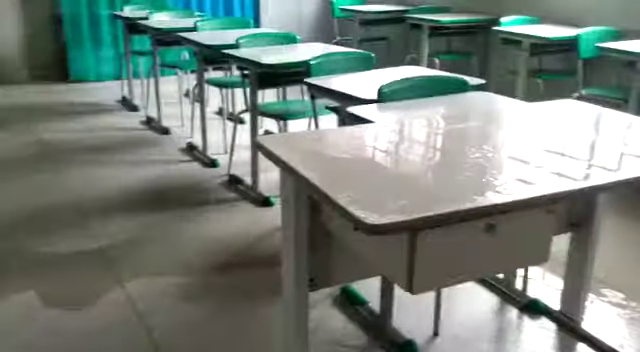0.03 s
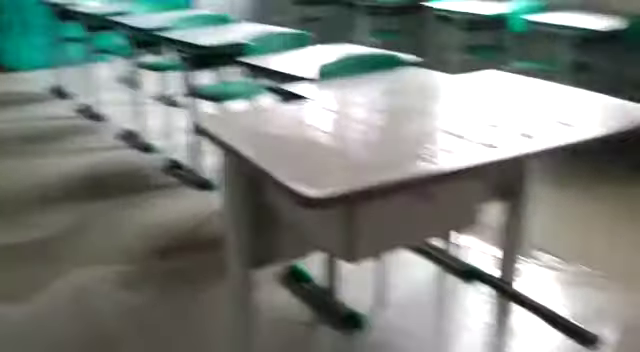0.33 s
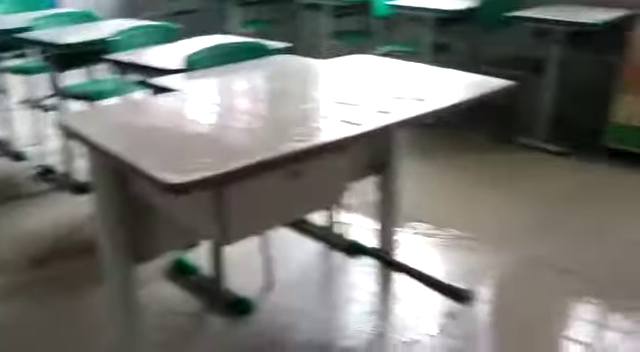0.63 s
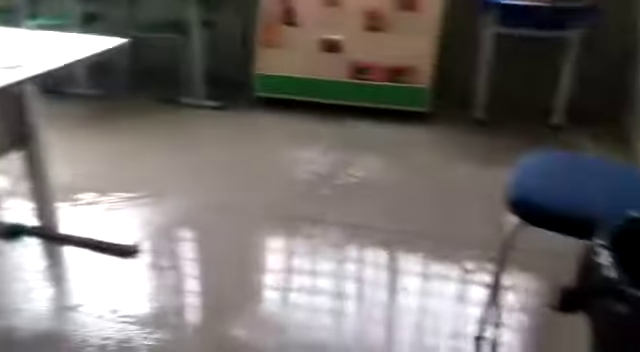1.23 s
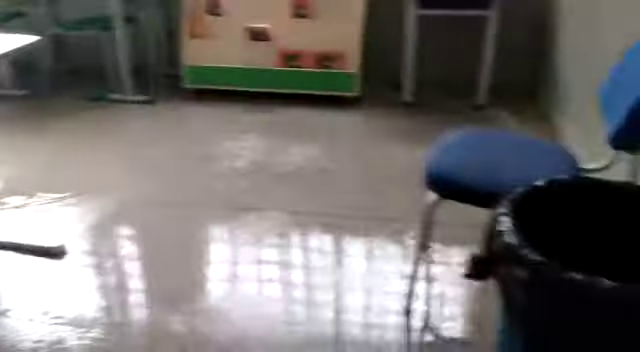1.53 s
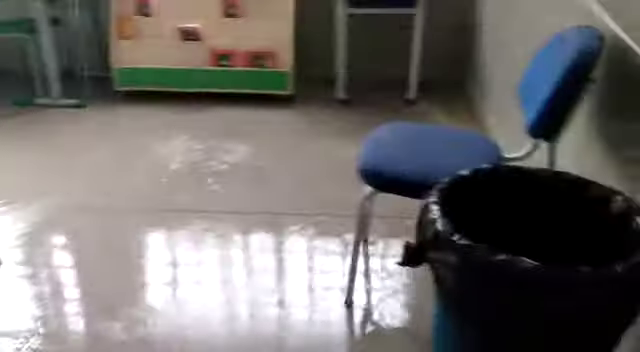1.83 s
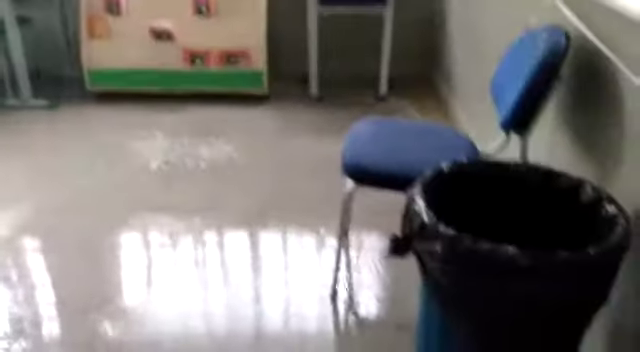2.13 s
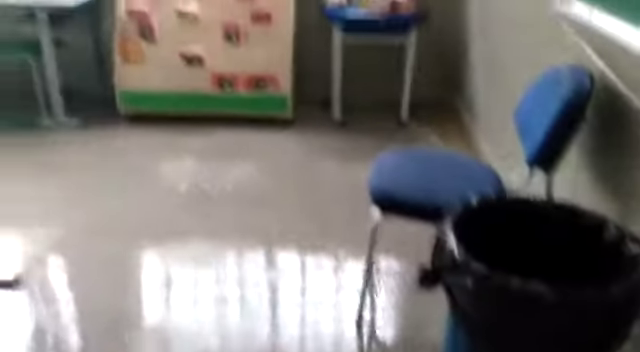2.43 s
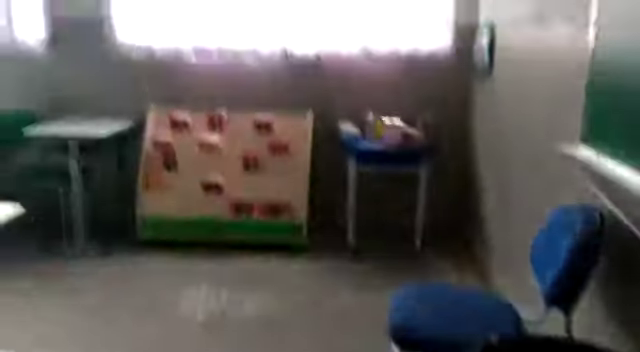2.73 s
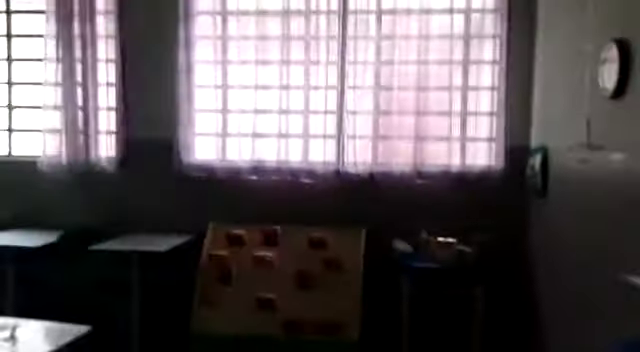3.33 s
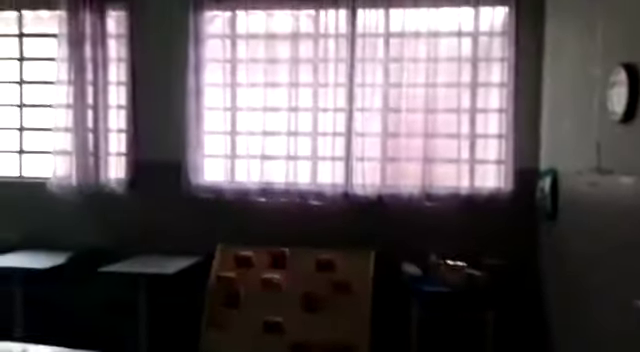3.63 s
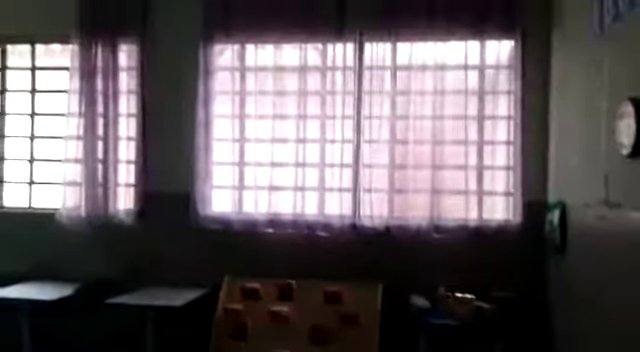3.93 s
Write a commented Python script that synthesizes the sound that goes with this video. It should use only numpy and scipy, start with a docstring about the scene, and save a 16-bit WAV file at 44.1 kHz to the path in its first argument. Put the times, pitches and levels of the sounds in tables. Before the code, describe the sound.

Irregular water drips splat and plip near the microphone in a bare classroom, each with a bright echo, slightly to the right. Behind them are a steady hiss of rain, a dying low rumble and faint, distant hollow tones.

```python
"""Sharp splats and lower plips ring out in an empty classroom: rain leaks through the ceiling
and drips onto wet tiles and desks. Each drop is a pulse and a short spray, which the hard room
answers with a long bright tail. Behind them are fine spatter, a steady rain hiss and a low rumble
that dies away. Faint hollow tones, narrow bands of noise, come from far off."""
import sys
import numpy as np
from scipy import signal
from scipy.fft import rfft, irfft
from scipy.io import wavfile
from scipy.ndimage import uniform_filter1d

SR = 44100
rng = np.random.default_rng(int(sys.argv[2]) if len(sys.argv) > 2 else 0)


def dump(signal):
    """Clip the signal to [-1, 1] and save it as 16-bit WAV at the path in sys.argv[1]."""
    limited = np.clip(np.atleast_2d(signal).T, -1, 1)
    pcm = np.round(limited * 32767).astype(np.int16)
    wavfile.write(sys.argv[1], SR, pcm)


N = 176400
TOP_HZ = 16000
ROOM_PAN_DB = -6.5  # every pan is left minus right: the room leans right


def undb(db):
    """Decibels to gain."""
    return 10 ** (np.asarray(db) / 20)


def unit(x):
    """Scale to rms 1."""
    return x / np.sqrt(np.mean(x ** 2))


def sides(pan_db):
    """Left and right gains of constant total power."""
    return unit(undb(np.array([[pan_db], [-pan_db]]) / 2))


def freqs(size=N):
    """Frequencies of a spectrum."""
    return np.arange(size // 2 + 1) * SR / size


def eq(points):
    """Gain over frequency through (Hz, dB) points on a log axis."""
    hz, db = np.array(points, float).T
    return undb(np.interp(np.log(freqs() + 1), np.log(hz), db))


def fader(rows):
    """Gain over time from rows that begin with seconds and dB."""
    times, db = np.array(rows).T[:2]
    return undb(np.interp(np.arange(N) / SR, times, db))


def bell(hz, octaves, size=N):
    """Gain over frequency of one resonance."""
    return np.exp(-(np.log2((freqs(size) + 1) / hz) / octaves) ** 2 / 4)


def drift(per_s):
    """Slow random wander of rms 1."""
    hold = int(SR / per_s)
    steps = np.repeat(rng.standard_normal(N // hold + 1), hold)
    return unit(uniform_filter1d(steps, hold)[:N])


def ripple(f, step_hz, depth_db):
    """Irregular peaks and dips about step_hz apart; the power stays even over several of them."""
    places = np.cumsum(rng.uniform(.4, 1.6, 1024)) * step_hz
    heights = (-1.) ** np.arange(1024) * rng.uniform(.3, 1.7, 1024)
    gain = undb(depth_db * np.interp(f, places, heights))
    return gain / np.sqrt(uniform_filter1d(gain ** 2, int(4 * step_hz / f[1])))


def diffuse(gain, spacing_m=0.16):
    """Room-filling noise of rms 1: the bass is alike at both microphones, the treble is not."""
    alike = .98 * np.sinc(2 * freqs() * spacing_m / 343)
    mid, side = (irfft(rfft(rng.standard_normal(N)) * gain * np.sqrt(1 + sign * alike), N)
                 for sign in (1, -1))
    return unit(np.array([mid + side, mid - side]))


def add(out, x, at):
    """Mix a sound in at a time in seconds."""
    i = max(int(at * SR), 0)
    out[:, i:i + x.shape[1]] += x[:, :max(out.shape[1] - i, 0)]


# Tone of the rumble's three registers. Each row: frequency in Hz, relative level in dB before roll-off.
DEEP_EQ = [(12, -36), (25, 1), (36, -16), (48, 6), (62, 4), (90, -30)]
BODY_EQ = [(45, -18), (75, 2), (125, 7.5), (180, 1), (260, -35)]
UPPER_EQ = [(130, -17), (200, 1.5), (310, -5), (430, -12.5), (600, -46), (1500, -34.5)]
# Their fader rides. Each row: time in seconds, gain in dB.
DEEP_RIDE = [(0.0, -52.5), (0.49, -62), (0.53, -48), (1.3, -57.5), (1.63, -44.5), (1.73, -47.5),
             (2.07, -54), (2.52, -70), (2.64, -62.5), (3.63, -73), (4.0, -89)]
BODY_RIDE = [(0.0, -41), (0.23, -36), (0.41, -43.5), (0.79, -41), (0.96, -46), (1.88, -37.5), (2.28, -46.5),
             (2.54, -69.5), (2.66, -58), (3.55, -67), (3.59, -54), (3.93, -70.5), (4.0, -85)]
UPPER_RIDE = [(0.0, -39), (0.89, -46), (1.02, -57.5), (1.15, -39), (1.24, -51), (1.32, -39.5), (1.38, -52),
              (1.47, -51.5), (1.65, -62.5), (1.84, -56), (2.1, -53.5), (2.49, -73.5), (3.56, -75.5),
              (3.72, -60.5), (4.0, -84)]

def rumble():
    """Three registers of low noise roll and die away; the upper one flutters."""
    def register(colour, ride):
        roll_off = 1 + (freqs() / colour[-1][0]) ** 2
        return diffuse(eq(colour) / roll_off) * fader(ride)

    low = register(DEEP_EQ, DEEP_RIDE) + register(BODY_EQ, BODY_RIDE)
    return low + register(UPPER_EQ, UPPER_RIDE) * undb(-1.5 + 2 * drift(13))


# A hollow sigh, far off. Each row: time in seconds, level in dB, centre in Hz.
SOUGH_PATH = [(0.0, -64.5, 787), (.23, -58.5, 812), (.44, -49.5, 770.5), (.64, -55, 811.3),
              (.98, -64.5, 785), (1.2, -56, 796.6), (1.36, -59, 885.6), (1.6, -70.5, 781.5),
              (4.0, -85, 788)]

def sough(width_hz=55):
    """A narrow band of noise whose centre wanders and whose level wavers."""
    times, _, centres = np.array(SOUGH_PATH).T
    hz = np.interp(np.arange(N) / SR, times, centres)
    band = diffuse(np.exp(-((freqs() - hz.mean()) / width_hz / 2) ** 2))
    glide = np.exp(2j * np.pi * np.cumsum(hz - hz.mean()) / SR)
    return np.real(signal.hilbert(band) * glide) * fader(SOUGH_PATH) * undb(2 * drift(14))


# Dull bumps in the rumble, and faint hollow tones from far off.
# Each row: start in seconds, seconds until the fade, centre in Hz, width in octaves, level in dB.
DULL_BUMPS = [(.2, 0.085, 198, 0.22, -41), (1.45, 0.048, 323, .12, -50), (1.8, 0.085, 264, 0.18, -47)]
FAR_TONES = [(.485, 0.023, 1155, 0.038, -52), (1.865, 0.054, 912, 0.052, -55.5),
             (3.38, 0.6, 743, 0.077, -63), (3.555, .33, 1488, .018, -63), (3.58, 0.16, 1130, .04, -61.5),
             (3.7, .3, 454, 0.068, -58), (3.81, 0.07, 307, .04, -63.5), (3.88, 0.19, 1135, 0.045, -57)]

def swells(rows, rise_s=0.015, fade_s=0.033):
    """Resonant bands of noise that rise, hold and fade."""
    t = np.arange(N) / SR
    out = np.zeros((2, N))
    for at, length, hz, octaves, db in rows:
        rise = np.clip((t - at) / rise_s, 0, 1)
        fade = np.exp(-np.maximum(t - at - length, 0) / fade_s)
        out += diffuse(bell(hz, octaves)) * rise * fade * undb(db)
    return out


# Tone of the rain bed, airy on top. Each row: frequency in Hz, relative level in dB.
RAIN_EQ = [(100, 0), (300, -9), (460, -3.5), (620, -4.5), (760, -8.5), (1000, -7.5), (1500, -9.5),
           (2200, -12), (4000, -10.5), (7000, -23), (11000, 4), (15500, 6.5)]
# Fader ride for hiss, spatter and crackle, with two brief dips. Each row: time in seconds, gain in dB.
RAIN_RIDE = [(1.7, 2.5), (1.96, -0.5), (2.2, 5), (2.39, -2.5), (2.45, 1.5)]

def rain(hiss_db=-50.5, treble_pan_db=-7, flicker_db=2):
    """Steady hiss, its treble leaning right, with two faint wavering hollow notes."""
    f = freqs()
    hiss = diffuse(eq(RAIN_EQ) * (f < TOP_HZ))
    lean_db = treble_pan_db * np.clip(f / 6000, 0, 1) * np.array([[1], [-1]]) / 2
    hiss = irfft(rfft(hiss) * undb(lean_db), N)
    hiss *= undb(hiss_db + flicker_db * drift(7.95)) * fader(RAIN_RIDE)
    low_note = undb(-73 + 5.7 * drift(13)) * diffuse(bell(hz=452, octaves=.06))
    high_note = undb(-66.5 + 3.24 * drift(11)) * diffuse(bell(hz=1223, octaves=.039))
    return hiss + low_note + high_note


SPRAY_DECAY_S = 0.00055

def crackle(per_s=160, level_db=-68, spread_db=24):
    """The finest droplets tick densely on the wet floor, each a tiny burst of noise."""
    hits = rng.random(N) < per_s / SR
    ticks = hits * undb(-spread_db * np.clip(rng.standard_normal(N), -2, 2))
    decay = np.exp(-np.arange(256) / SR / SPRAY_DECAY_S)
    bursts = signal.oaconvolve(ticks, decay)[:N] * rng.standard_normal((2, N))
    bright = irfft(rfft(bursts) * bell(hz=13000, octaves=1), N)
    return undb(level_db) * sides(ROOM_PAN_DB) * unit(bright)


# Reverb time of the bare room. Each row: frequency in Hz, seconds to fall by 60 dB.
ROOM_DECAY = [(2000, 0.87), (4000, 0.73), (8000, 0.69), (12000, 0.66), (16000, 0.33)]

def room_tail(build_s=0.0039, size=49152):
    """Echoes off the hard walls build into a diffuse tail; the treble dies first."""
    t = np.arange(size) / SR
    noise = rfft(rng.standard_normal((2, size)))
    centres = [hz for hz, _ in ROOM_DECAY]
    tail = np.zeros((2, size))
    for share, (_, t60) in zip(np.eye(len(centres)), ROOM_DECAY):
        band = irfft(noise * np.interp(freqs(size), centres, share))
        tail += band * undb(-60 * t / t60)
    return tail * (1 - np.exp(-t / build_s))


# Broad tone of the room's treble. Each row: frequency in Hz, gain in dB.
ROOM_EQ = [(2000, 2), (3000, -2.5), (3950, 5.5), (5200, 2), (6200, 2.5), (8500, -1.5), (10800, 2),
           (15000, -0.5)]

def room_colour(x):
    """The room adds its broad tone and fine peaks and dips, strongest in the lower treble."""
    f = freqs()
    depth_db = 2.5 * np.clip(f / 1530 - .5, 0, 1) * np.clip(7000 / (f + 1), .5, 1.5)
    return irfft(rfft(x) * ripple(f, step_hz=125.97, depth_db=depth_db) * eq(ROOM_EQ), N)


def impact(hz, octaves, steepness=2.08, skirt_db=-45, low_cut_hz=2270, size=2048):
    """The pressure pulse of one drop with its brief uneven ringing."""
    f = freqs(size)
    hump = np.exp(-np.abs(np.log2((f + 1) / hz) / octaves / 2) ** steepness * np.sqrt(2))
    ring = ripple(f, step_hz=189.7, depth_db=4 * np.clip(6000 / (f + 1), .4, 1.5))
    gain = ring * (hump + undb(skirt_db)) / np.sqrt(1 + (low_cut_hz / (f + 200)) ** 8)
    # minimum phase puts the attack first and the ringing after it
    cepstrum = irfft(np.log(gain))
    cepstrum[1:size // 2] *= 2
    cepstrum[size // 2 + 1:] = 0
    return irfft(np.exp(rfft(cepstrum))) / np.sqrt(np.mean(gain ** 2 * (f < TOP_HZ)))


def early_paths(t, floor_s=0.0037, floor_db=-5.5, furniture_db=-4.5, echoes_per_s=660, decay_s=0.18):
    """The direct sound, one bounce off the floor and sparse echoes off the furniture."""
    paths = rng.standard_normal((2, t.size)) * (rng.random((2, t.size)) < echoes_per_s / SR)
    paths *= np.exp(-t / decay_s) * (t > .002)
    paths *= undb(furniture_db) / np.sqrt(np.sum(paths ** 2, axis=1, keepdims=True) + 1e-9)
    lag = rng.integers(-8, 9)  # samples early on one side, late on the other
    bounce = int(floor_s * rng.uniform(.7, 1.3) * SR)
    for channel, arrival in enumerate((36 + lag, 36 - lag)):
        paths[channel, arrival] += 1
        paths[channel, arrival + bounce] += undb(floor_db)
    return paths


def drop(tail, db, hz, octaves, direct_db, pan_db, size=4096):
    """One drop: impact and spray arrive by the early paths, and the impact rings on in the tail."""
    t = np.arange(size) / SR
    splash = 0.24 * rng.standard_normal((2, size)) * np.exp(-t / SPRAY_DECAY_S)
    splash[:, 0] += 1  # the hit that leads the spray
    splash /= np.sqrt(np.sum(splash ** 2, axis=1, keepdims=True))
    near = signal.fftconvolve(splash, early_paths(t), axes=1)[:, :size] * np.sqrt(.002 * SR)
    heard = tail * sides((ROOM_PAN_DB + pan_db) / 2)
    heard[:, :size] += near * undb(direct_db) * sides(pan_db)
    return undb(db) * signal.oaconvolve(heard, impact(hz, octaves)[None], axes=1)


def spatter(tails, per_s=24):
    """Small bright drops fall at random around the large ones."""
    out = np.zeros((2, N + SR))  # a second of lead-in, so tails already ring at the start
    scatter = rng.uniform(-1.2, 1, (int(per_s * (N / SR + 1)), 4))
    for k, (timing, weight, pitch, place) in enumerate(scatter):
        small = drop(tails[k % len(tails)], db=-59 + 10.5 * weight, hz=13200 * 2 ** (0.62 * pitch),
                     octaves=0.24, direct_db=10.5, pan_db=ROOM_PAN_DB + 4 * place)
        add(out, small, (k + 2 * timing) / per_s)
    return out[:, SR:]


def snap():
    """A short, dry midrange snap, like brief overload."""
    gain = bell(hz=2200, octaves=1, size=128)
    return np.roll(irfft(gain), 36) / np.sqrt(np.mean(gain ** 2))


# The foreground splats and plips. Each row: start in seconds, tail level in dB, centre in Hz,
# width in octaves, direct sound over the tail in dB, pan in dB.
CEILING_DRIPS = [ (.2463, -47, 11100, 0.35, 13.5, -14), (.3257, -36, 12100, 0.81, 11.5, -7),
                 (.5013, -59.5, 7050, 0.4, 16.5, -18), (.5475, -34, 3355, 0.31, 8.5, 5),
                 (.549, -43, 8950, 1, 9, -17), (.621, -36, 9800, 0.53, 10, -6),
                 (.627, -38, 3530, 0.28, -2, 9), (.7582, -26, 9380, 0.34, 12.5, -4),
                 (.8809, -34, 10600, 0.38, 3, 1), (.9163, -48, 11400, 0.92, 18, -8),
                 (.9168, -51, 4200, 0.47, 8.5, 7), (1.0056, -37, 9900, 0.66, 9, -3),
                 (1.0096, -52.5, 4260, 0.17, 11, 4), (1.1543, -59, 9400, 0.27, 28, -16),
                 (1.2042, -53.5, 12700, 0.26, 19.5, -10), (1.291, -28, 11600, 0.49, 10.5, 0),
                 (1.4611, -46.5, 4270, 0.25, 9, 2.5), (1.476, -45, 11800, 0.35, 15, -7),
                 (1.513, -38, 12900, 0.47, 11, -3), (1.5665, -38, 10800, 0.93, 14, -4.5),
                 (1.5678, -41.5, 3650, 0.28, 8.5, 5), (1.6302, -38.5, 8600, 0.44, 6, -1),
                 (1.713, -43, 6370, 0.11, 8, -2), (1.714, -36.5, 11400, 0.56, 4, -5.5),
                 (1.995, -51, 7000, 0.12, 11, -17), (2.0273, -51.5, 3200, 0.18, 13, -5),
                 (2.028, -51.5, 8050, 0.56, 15, -4), (2.0567, -33.5, 12000, 0.45, 12.5, -2),
                 (2.0572, -58.5, 4900, 0.22, 15, 5), (2.1236, -38, 8270, 0.27, 5.5, -1),
                 (2.17, -40.5, 9800, 0.44, 11, -1.5), (2.4019, -42.5, 10700, 0.74, 5.5, -2),
                 (2.4324, -54, 10000, 0.57, 21, -4), (2.4668, -38, 5670, 0.49, 11, 2.5),
                 (2.4887, -29.5, 9750, 0.45, 9.5, 0), (2.7686, -44, 12200, 0.83, 12, -5),
                 (2.8694, -45.5, 6800, 0.17, 4.5, -8), (2.9627, -41, 8560, 0.43, 12, -1.5),
                 (3.019, -46.5, 9300, 0.25, 9, -5), (3.227, -47, 6700, 0.14, 8, -3),
                 (3.2286, -45, 13500, 0.38, 15, -10), (3.289, -57, 13000, 0.27, 11, 12),
                 (3.3328, -44.5, 11900, 0.35, 8.5, -4), (3.3662, -51.5, 4440, 0.14, 7, -7),
                 (3.3807, -37.5, 11500, 0.65, 4.5, -5), (3.6187, -48, 5770, 0.29, 10.5, -8),
                 (3.7115, -36, 12900, 0.61, 4.5, -6), (3.7788, -41.5, 4260, 0.59, 8, 2),
                 (3.7838, -33.5, 9000, 0.57, 9.5, -2)]
# Midrange snaps on two of the loudest drips. Each row: start in seconds, level in dB.
DRY_SNAPS = [(0.7585, -29), (1.291, -27.5)]

def dripping(tails):
    """Large drops fall from the ceiling onto tiles and desks; two of the loudest carry a dry snap."""
    out = np.zeros((2, N))
    for k, (at, *voicing) in enumerate(CEILING_DRIPS):
        add(out, drop(tails[k % len(tails)], *voicing), at)
    for at, db in DRY_SNAPS:
        add(out, snap() * sides(ROOM_PAN_DB / 2) * undb(db), at)
    return out


def scene():
    """Drips in front of rain, rumble and faint far tones."""
    tails = [room_tail() for _ in range(3)]
    patter = (spatter(tails) + crackle()) * fader(RAIN_RIDE)
    water = room_colour(dripping(tails) + patter + rain())
    return water + rumble() + swells(DULL_BUMPS) + sough() + swells(FAR_TONES)


def record(dry):
    """The recorder cuts the top with a steep low-pass."""
    return signal.sosfilt(signal.ellip(10, .2, 70, TOP_HZ, fs=SR, output="sos"), dry)


dry = scene()
out = record(dry)
dump(out)
```